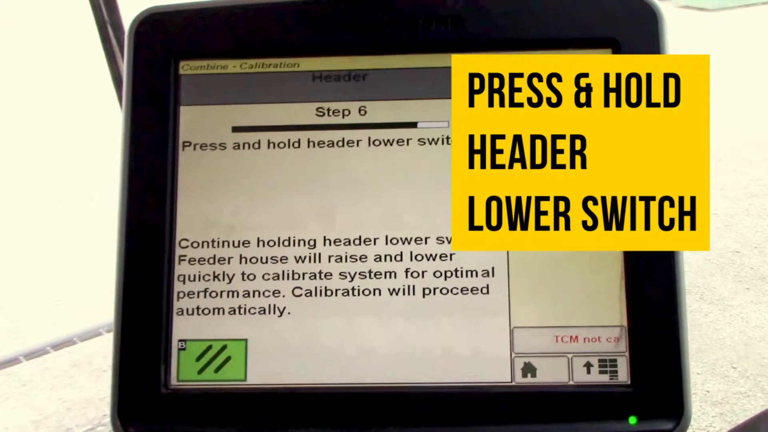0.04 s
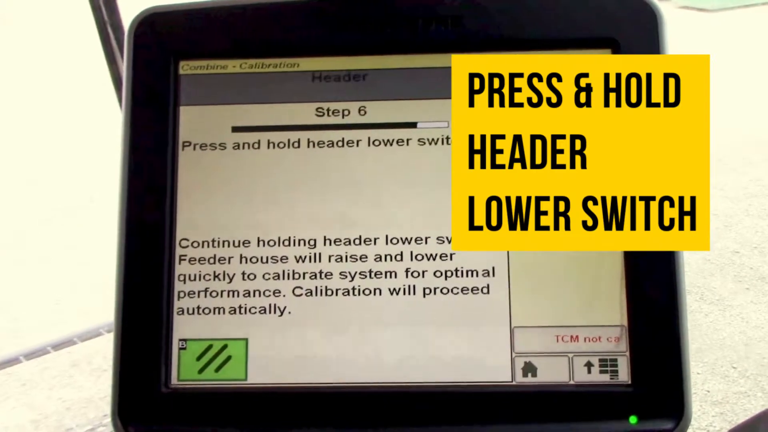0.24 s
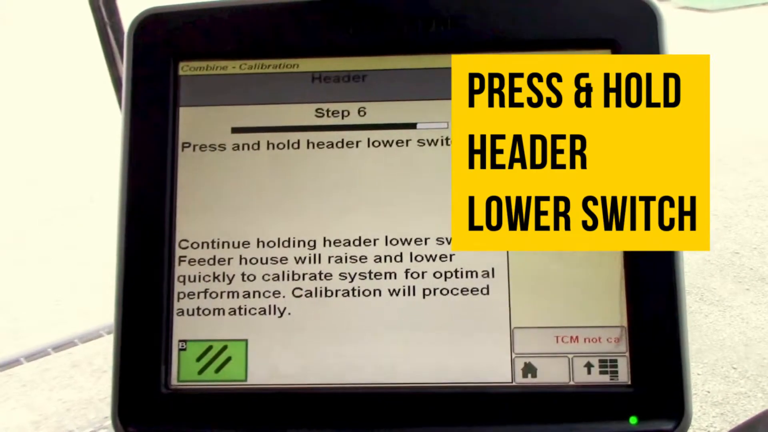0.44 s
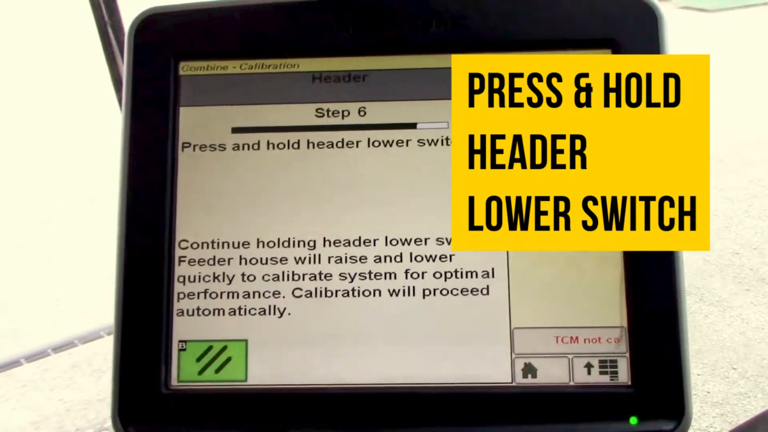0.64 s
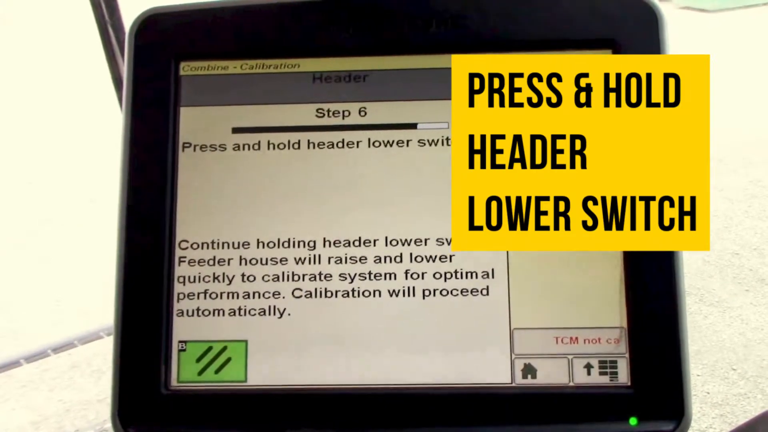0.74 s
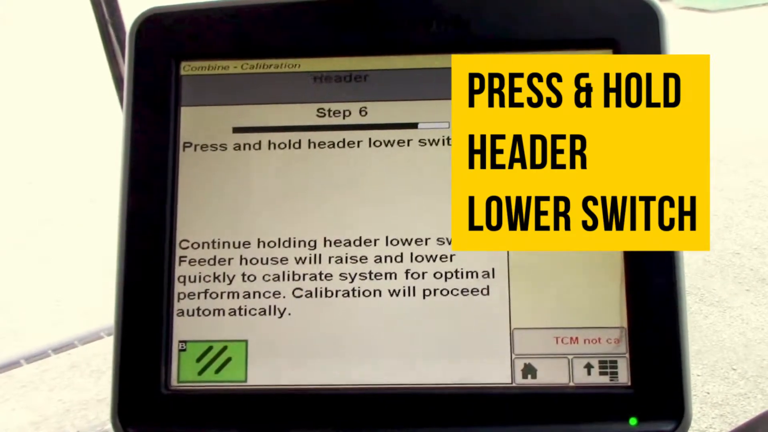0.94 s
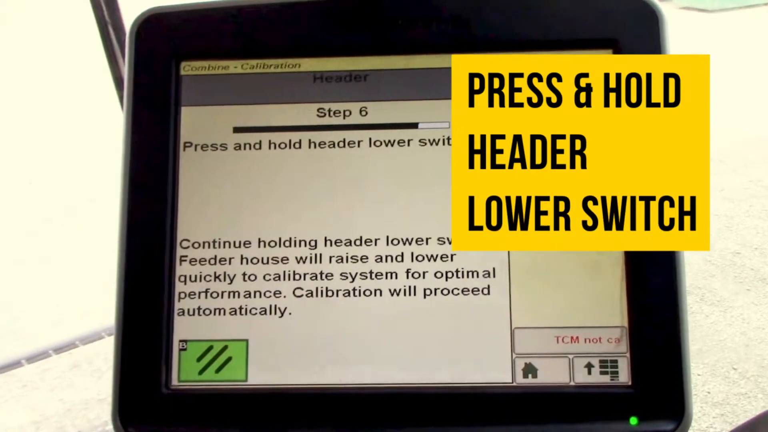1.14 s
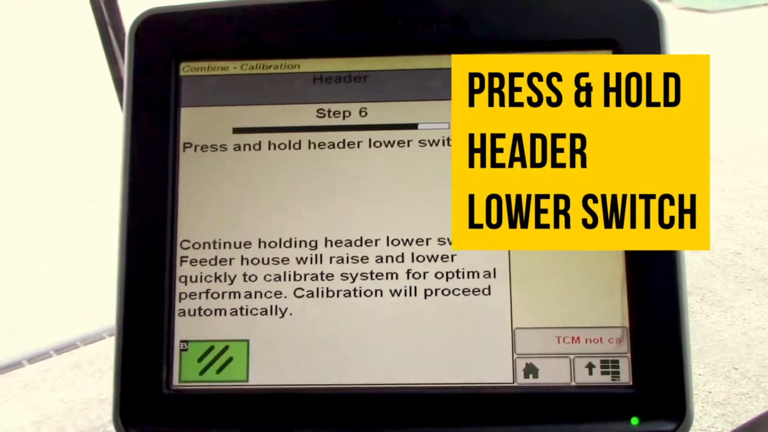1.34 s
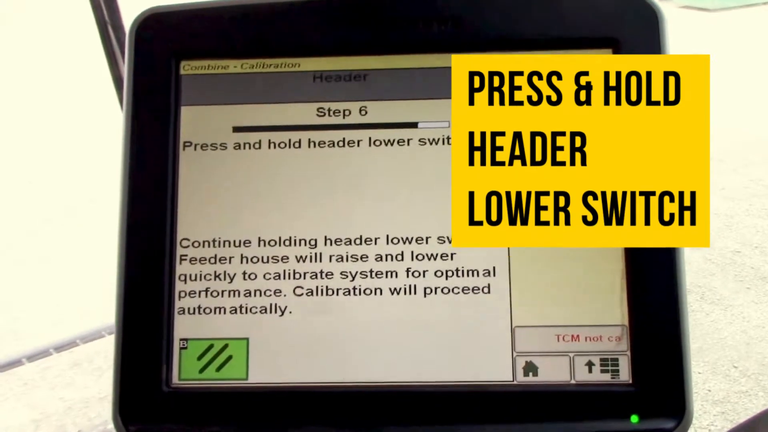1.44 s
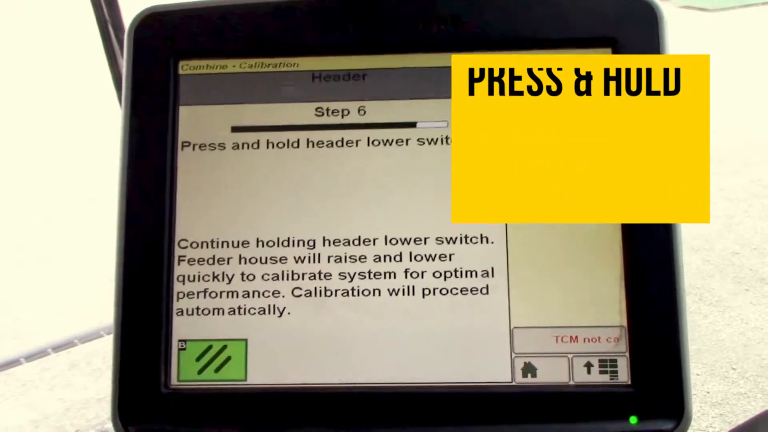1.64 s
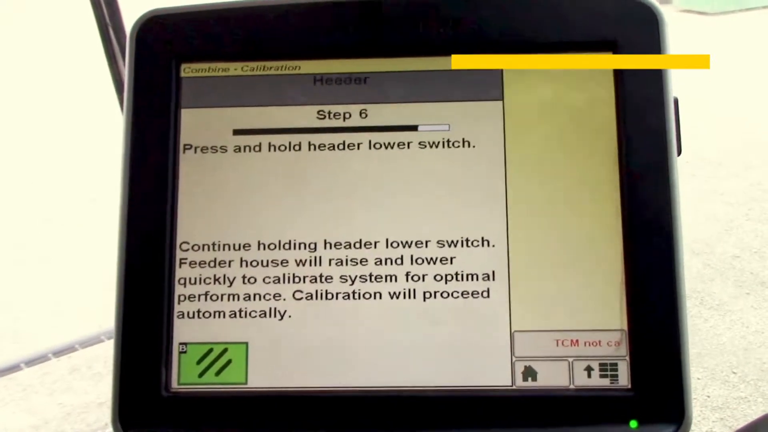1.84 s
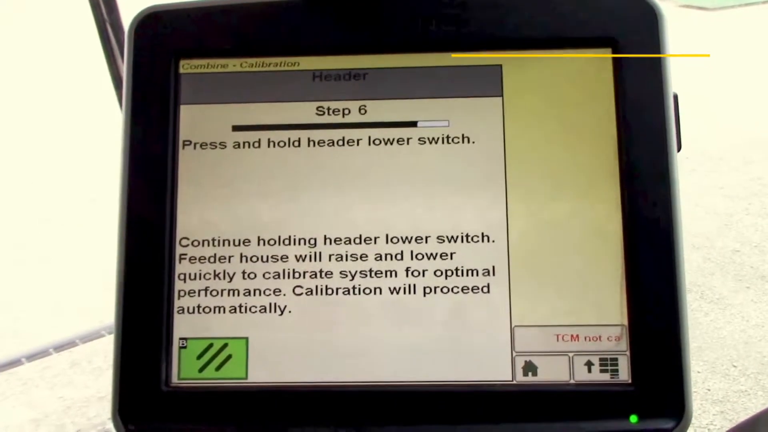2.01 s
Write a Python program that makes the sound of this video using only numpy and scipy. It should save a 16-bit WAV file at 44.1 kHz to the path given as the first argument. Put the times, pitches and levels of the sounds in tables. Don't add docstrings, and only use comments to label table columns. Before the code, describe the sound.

Large diesel harvester engine droning steadily at high idle, heard from inside its closed cab

```python
import sys
import numpy as np
from scipy import signal
from scipy.fft import rfft, irfft
from scipy.io import wavfile
from scipy.ndimage import uniform_filter1d, map_coordinates

SR = 44100
rng = np.random.default_rng(int(sys.argv[2]) if len(sys.argv) > 2 else 0)


def digitize_waveform(pressure):
    field = np.atleast_2d(pressure).T
    bounded = np.clip(field, -1, 1)
    quanta = np.round(bounded * 32767).astype(np.int16)
    wavfile.write(sys.argv[1], SR, quanta)


def boost(x):
    u = np.asarray(x, float) / 20
    return 10 ** u


N = 91331
CYCLE_HZ = 19.4995


def unit(x):
    return x / np.sqrt(np.mean(x ** 2) + 1e-20)


def coloured(x, curve, peaks=()):
    hz = np.fft.rfftfreq(N, 1 / SR)
    f, level = np.transpose(curve)
    db = np.interp(np.log(hz + 1), np.log(f + 1), level)
    for centre, width, height in peaks:
        db = db + height / (1 + (2 * (hz - centre) / width) ** 2)
    return unit(irfft(rfft(x) * boost(db), N))


def wobble(rate):
    points = rng.standard_normal(int(N * rate / SR) + 4)
    return map_coordinates(points, [np.arange(N) * rate / SR])


def tones(hz, rows, drift_db, drift_rad):
    t = np.arange(N) / SR
    total = 0
    for multiple, db in rows:
        level = np.sqrt(2) * boost(db + drift_db * wobble(12))
        phase = 2 * np.pi * (hz * multiple * t + rng.random()) + drift_rad * wobble(6)
        total = total + level * np.sin(phase)
    return total


def locked(hz, rows):
    t = np.arange(N) / SR - 1.0225
    total = 0
    for multiple, db, crest_ms in rows:
        phase = 2 * np.pi * hz * multiple * (t - crest_ms / 1000) + .1 * wobble(6)
        total = total + np.sqrt(2) * boost(db + 0.4) * np.cos(phase)
    return total


# t/s, level/dB, hold/s
SURGE_TIMES = [(0.001, 5.5, 0.006), (0.06, 6, 0.0051), (0.083, 4, 0.0062), (0.121, 5, 0.0045),
               (0.197, 5.0, 0.03), (0.247, 3.5, 0.0), (0.312, 6.5, 0.0015), (0.364, 6.5, 0.02),
               (0.44, 5.5, 0), (0.47, 7.5, 0.011), (0.507, 3.5, 0.0053), (0.512, 2.5, 0.003), (0.562, 2, 0),
               (0.611, 6, 0.0044), (0.681, 1.5, 0.0047), (0.766, 4.5, 0.0033), (0.817, 1.5, 0.012),
               (0.879, 6, 0.0), (0.915, 2, 0.0075), (0.958, 2.5, 0.022), (1.019, 7.5, 0.03),
               (1.074, 6.5, 0.0095), (1.113, 3, 0.0), (1.136, 4.5, 0.0047), (1.172, 2.0, 0),
               (1.227, 4, 0.0034), (1.271, 2, 0.006), (1.328, 8, 0.0077), (1.392, 1, 0.0095),
               (1.43, 5, 0.022), (1.489, 4, 0.024), (1.527, 6.5, 0.025), (1.656, 4, 0.0039),
               (1.687, 7, 0.012), (1.749, 3.0, 0.01), (1.803, 5.5, 0.015), (1.852, 6, 0.002),
               (1.894, 6, 0.012), (1.903, 6, 0.0), (1.943, 6, 0.0044), (1.991, 7, 0.038)]


def surge_db():
    rise_s, fall_s = .005, 0.021
    start, db, hold = np.transpose(SURGE_TIMES)[:, :, None]
    late = np.arange(N) / SR - start
    rise = -.5 * (np.minimum(late, 0) / rise_s) ** 2
    fall = -np.maximum(late - hold, 0) / fall_s
    return (db * np.exp(rise + fall)).max(axis=0)


# f/Hz, level/dB per Hz
CAB_AIR = [(20, -42), (55, -19.5), (85, -7.5), (100, 4.5), (125, 5), (145, -7.5), (180, -23.5), (400, -120)]
# multiple of the cycle rate, level/dB rms,
# crest after the common moment/ms
LOW_ORDER_TONES = [(5, -33.5, -1.6), (6, -25.5, .3), (7, -40, 2.6), (8, -36.5, 5.3), (9, -38, 4.5),
                   (12, -35.5, 1.4)]
# f/Hz, level/dB rms, crest after the common
# moment/ms
CROWDING_TONES = [(100.9, -40.5, .5), (104.69, -39.5, .2), (107.86, -40, .6), (108.54, -40, -3.1),
                  (109.62, -33, 0), (111.25, -37.5, 0), (112.25, -40.5, -2.7), (112.8, -33.5, 0),
                  (124.65, -35.5, -.2), (127.88, -37, 3.6), (128.63, -40, -3.5), (130.75, -40, 3.7),
                  (131.58, -38, 1.8), (150.33, -36.5, 1.7)]


def boom():
    rumble = boost(-32) * coloured(rng.standard_normal(N), CAB_AIR)
    x = rumble + locked(CYCLE_HZ, LOW_ORDER_TONES[:3]) + locked(1, CROWDING_TONES)
    power = uniform_filter1d(uniform_filter1d(x ** 2, size=600), size=600)
    size = np.sqrt(np.abs(power)) / np.std(x)
    evened = x / (size + 0.09) ** 0.4
    surge = surge_db()
    swell = boost(.8 * (surge - surge.mean()))
    return swell * evened + locked(CYCLE_HZ, LOW_ORDER_TONES[3:])


# f/Hz, level/dB
BLOCK = [(200, -67.5), (340, -6.1), (565, -10.5), (900, -10.5), (1100, -18.5), (2100, -16.5), (3000, -27),
         (6000, -119)]
# f/Hz, level/dB
BRIGHT_HISS = [(1500, -88), (3000, 3.5), (3700, 7), (5000, -2.5), (7000, -9.6), (9500, -16), (13500, -20),
               (15700, -43)]
# f/Hz, width/Hz, level/dB
SINGING_STEEL = [(920, 60, 4), (6080, 100, 7), (6750, 150, 4), (7640, 100, 5), (7860, 120, 6),
                 (8940, 100, 6), (9330, 80, 5), (10490, 70, 8), (10720, 70, 10), (12330, 150, 13),
                 (12920, 80, 5)]
# t/s, level/dB
CLATTER_SWELLS = [
    (.102, 2),
    (.285, 2.5),
    (.53, 1.5),
    (.585, 1.5),
    (.735, 2),
    (1.165, 1.5),
    (1.308, 2),
    (1.6, 2.5),
]


def clatter():
    cycle = np.arange(N) / SR * CYCLE_HZ
    size = 2048
    same = rng.standard_normal(size)[(cycle % 1 * size).astype(int)]
    firing = .08 * np.sin(2 * np.pi * 6 * cycle)
    whole_cycle = .11 * np.sin(2 * np.pi * cycle)
    half_bank = .08 * np.sin(2 * np.pi * 3 * cycle)
    beat = 1 + firing + whole_cycle + half_bank
    clatter_swell_db = 0
    for start, db in CLATTER_SWELLS:
        clatter_swell_db = clatter_swell_db + db * np.exp(-.5 * ((cycle / CYCLE_HZ - start) / .014) ** 2)
    knocks = boost(-8.5) * same + rng.standard_normal(N)
    raw = beat * knocks * boost(clatter_swell_db + 0.3 * wobble(8.9))
    body = boost(-34.3) * coloured(raw, BLOCK, SINGING_STEEL)
    fluttering = raw * boost(1.3 * wobble(45))
    return body + boost(-53.8) * coloured(fluttering, BRIGHT_HISS, SINGING_STEEL)


# multiple of the cycle rate, level/dB rms
ENGINE_TONES = [(11, -42), (15, -42), (24, -46.5), (53, -64), (59, -62), (90, -52)]
# multiple of its rate, level/dB rms
PISTON_TONES = [(1, -35), (2, -45.5), (3, -54), (4, -58.5)]
# multiple of its rate, level/dB rms
GEAR_TONES = [(1, -41), (2, -50)]
# multiple of its rate, level/dB rms
FAN_PUMP_TONES = [(1, -47), (2, -60), (4, -66)]
# multiple of its rate, level/dB rms
BELT_TONES = [(1, -46)]


def whines():
    parts = [(330.8, PISTON_TONES), (749.5, GEAR_TONES), (848.8, FAN_PUMP_TONES), (676.8, BELT_TONES)]
    steady = sum(tones(hz, rows, drift_db=.4, drift_rad=.08) for hz, rows in parts)
    return tones(CYCLE_HZ, ENGINE_TONES[1:], drift_db=1.4, drift_rad=0.11) + steady


# f/Hz, level/dB per Hz
PANELS = [(60, -90.5), (120, -12), (150, 0.5), (200, -8.5), (250, -7.5), (330, -15), (430, -16.5),
          (900, -120)]
# multiple of its rate, level/dB rms
COOLING_FAN_TONES = [(2, -41.5)]


def drone():
    lumps = boost(-30.5 + 1.4 * wobble(5.54) + 0.85 * wobble(7.1))
    panels = lumps * coloured(rng.standard_normal(N), PANELS)
    engine = tones(CYCLE_HZ, ENGINE_TONES[:1], drift_db=6, drift_rad=0.45)
    fan = tones(109.63, COOLING_FAN_TONES, drift_db=-2.0, drift_rad=0.74)
    return panels + engine + fan


def scene():
    return (boom() + clatter() + whines() + drone())[None]


def roll_off(x):
    return signal.sosfilt(signal.butter(12, 15720, fs=SR, output="sos"), x)


def record(dry):
    ceiling, knee = .36, 4
    ducked = dry * boost(3.2 - surge_db())
    mix = ducked / (1 + np.abs(ducked / ceiling) ** knee) ** (1 / knee)
    return roll_off(mix)


dry = scene()
out = record(dry)
digitize_waveform(out)
```